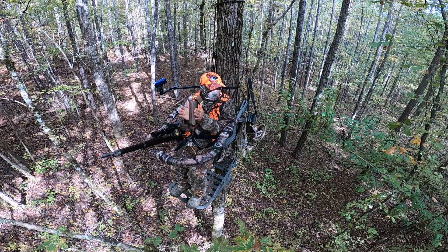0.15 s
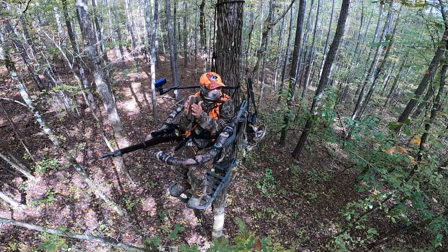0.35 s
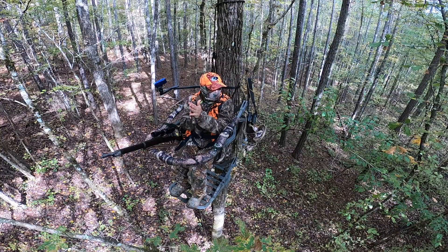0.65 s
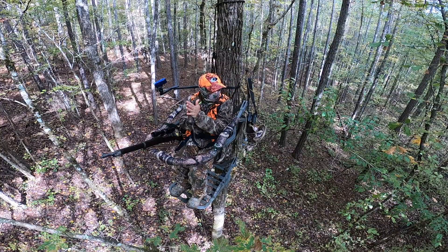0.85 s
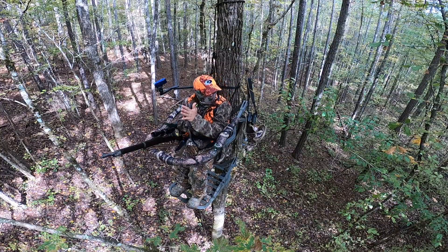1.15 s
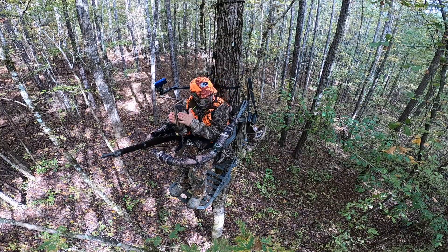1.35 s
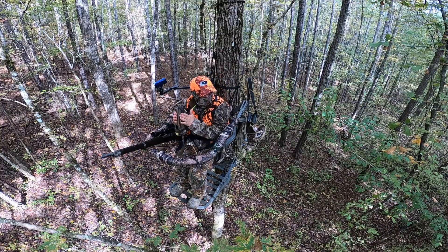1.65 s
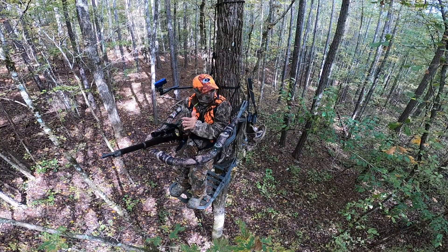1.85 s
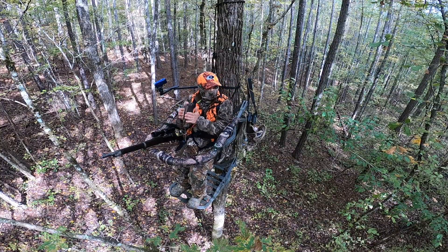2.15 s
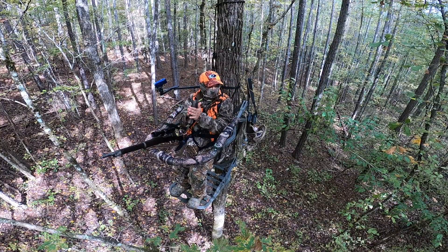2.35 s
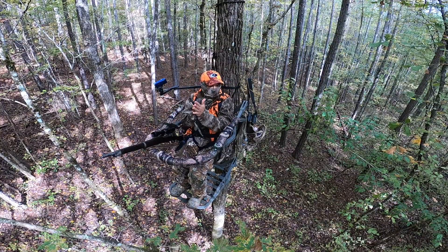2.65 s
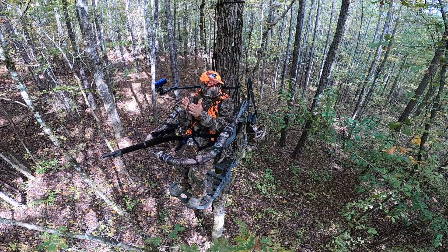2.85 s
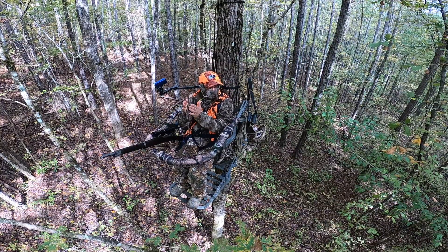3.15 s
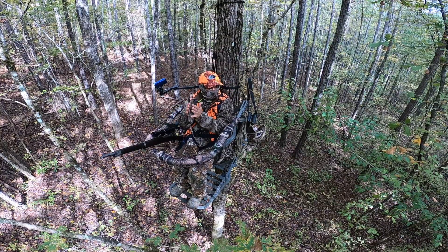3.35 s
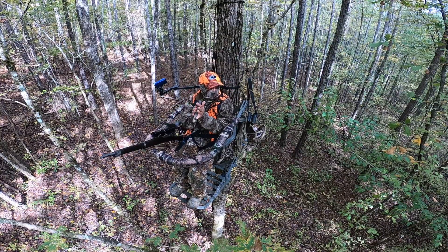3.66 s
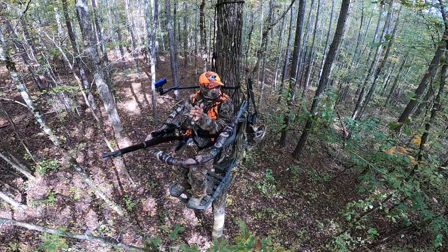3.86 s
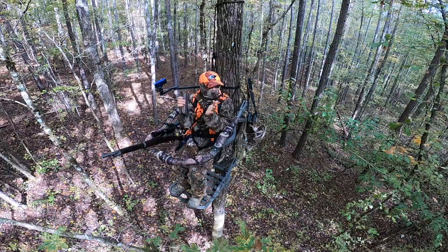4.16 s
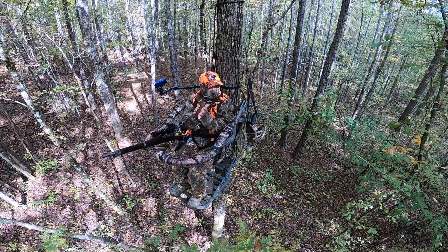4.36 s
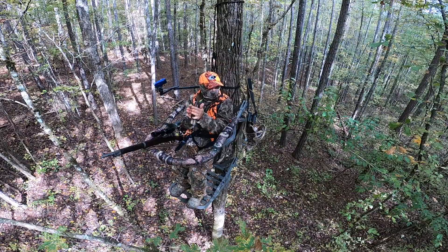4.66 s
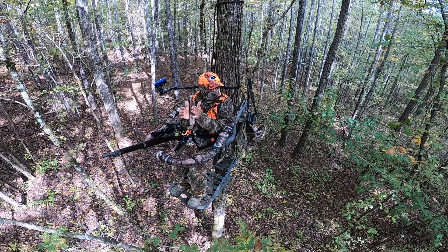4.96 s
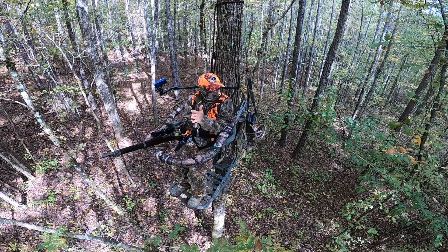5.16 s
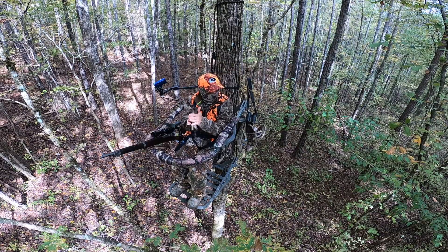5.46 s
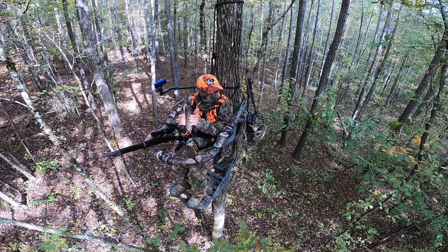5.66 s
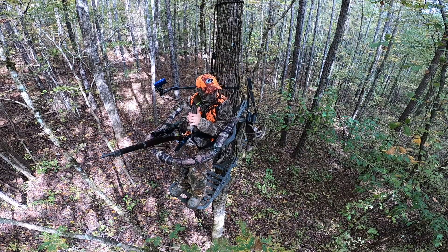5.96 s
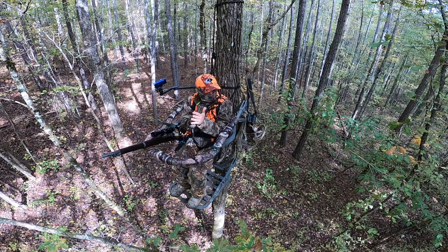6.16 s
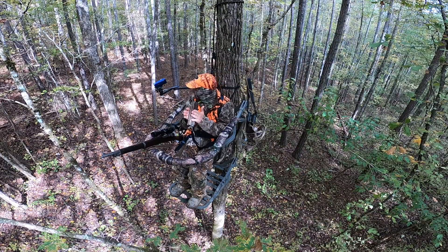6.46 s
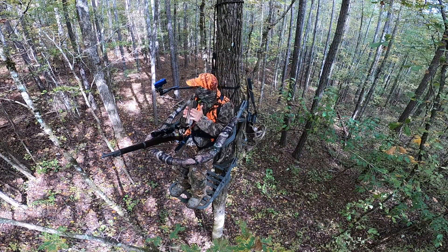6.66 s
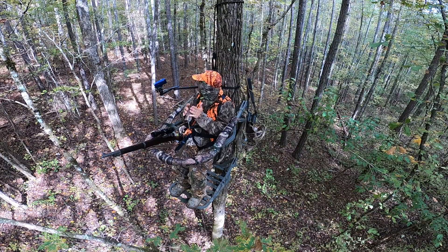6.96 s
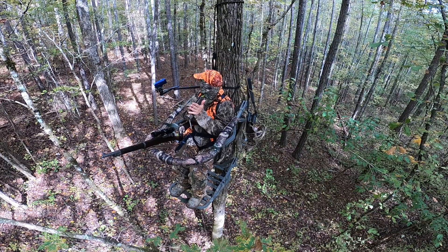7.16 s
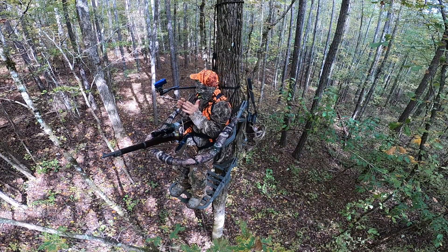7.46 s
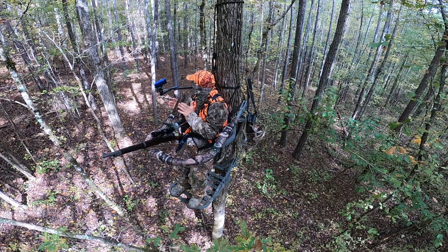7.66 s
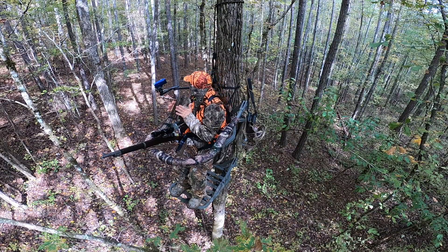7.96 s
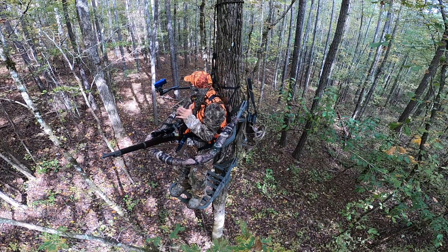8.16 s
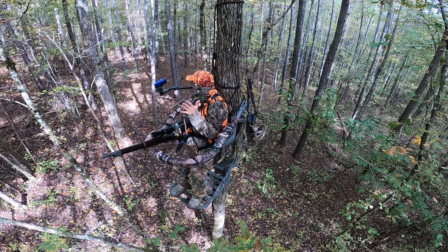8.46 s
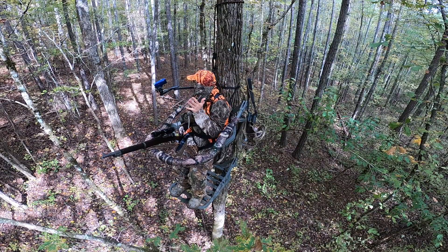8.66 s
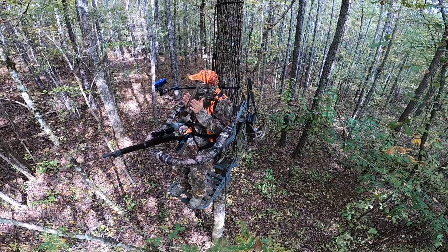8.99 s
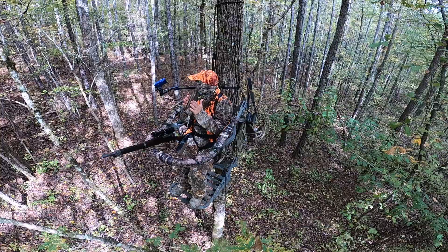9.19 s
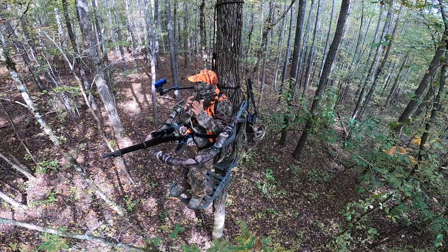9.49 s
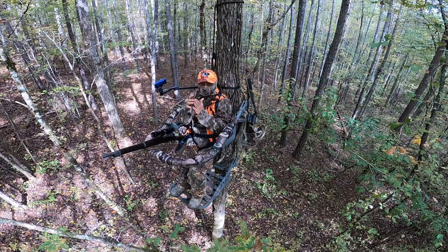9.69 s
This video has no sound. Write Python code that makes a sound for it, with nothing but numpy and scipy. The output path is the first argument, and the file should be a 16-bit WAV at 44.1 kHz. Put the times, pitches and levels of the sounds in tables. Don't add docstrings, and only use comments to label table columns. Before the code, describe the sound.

A hunter high in a tree works a bag of hard antler rods by hand. Sharp, dry knocks come in tight irregular clusters with quiet gaps, then a denser rolling rattle with short scrapes, then slower separate bursts. A soft, bright echo scatters off the trunks over hushed leaves. The close microphone catches low wind rumble and slightly overloads on the hardest hits.

```python
import sys
import numpy as np
from scipy import signal
from scipy.io import wavfile
from scipy.ndimage import uniform_filter1d

SR = 44100
rng = np.random.default_rng(int(sys.argv[2]) if len(sys.argv) > 2 else 0)


def undo_db(level):
    steps = np.asarray(level, float) / 20
    return 10 ** steps


def store_pcm(level_fs):
    pcm = np.round(np.clip(level_fs, -1, 1) * 32767).astype(np.int16)
    wavfile.write(sys.argv[1], SR, np.atleast_2d(pcm).T)


N = 433503

# [f/Hz, echo level/dB, t60/s, left-right likeness 0-1]
WOODS_BANDS = [(60, -34.5, 1.6, 0.96), (500, -58, 29, .8), (1500, -38.5, 0.89, 0.26),
               (2820, -34, 0.98, 0.07), (4500, -37, 0.89, 0.084), (6500, -30, 0.73, 0.0065),
               (8900, -35.5, 0.53, 0.0099), (12500, -30, 0.72, 0.087)]


def curve(points, hz, column=1):
    table = np.array(points)
    return np.interp(np.log(hz), np.log(table[:, 0]), table[:, column])


def drift(rate):
    r = np.exp(-80 * np.pi * rate / SR)
    coarse = rng.standard_normal(N // 40 + 2002)
    slow = signal.lfilter([1], [1, -2 * r, r * r], coarse)[2000:]
    return np.interp(np.arange(N) / 40, np.arange(len(slow)), slow / slow.std())


def noise_bands(size):
    white = rng.standard_normal((2, 2, size))
    edges_hz = 22 * 2 ** np.arange(0, 9.6, .5)
    for k, (low, high) in enumerate(zip(edges_hz, edges_hz[1:])):
        band = signal.butter(2, [low, high], "band", fs=SR, output="sos")
        mid, side = signal.sosfilt(band, white[k % 2])
        yield np.sqrt(low * high), mid, side


def spread(mid, side, alike):
    alike = np.clip(alike, -1, 1)
    return np.sqrt(1 + alike) * mid + np.sqrt(1 - alike) * side * [[1], [-1]]


def wind(lumpy_db=1.5, under_db=-0.5, top_hz=53.0):
    # [t/s, level/dB]
    gusts = [(0.0, -62), (.25, -45.5), (.42, -54.5), (0.7, -49), (1.1, -73.5), (1.72, -47.5), (2.1, -60.5),
             (2.65, -68.5), (3.5, -55.5), (4.7, -67.5), (5.47, -59.5), (6.9, -63), (7.2, -50.5),
             (7.5, -66.5), (8.03, -57.5), (9.25, -64), (9.5, -60), (9.83, -50.5)]
    rumble = signal.butter(3, [24.0, top_hz], "band", fs=SR, output="sos")
    mid, side = signal.sosfilt(rumble, rng.standard_normal((2, N)))
    gust_db = np.interp(np.arange(N) / SR, *np.transpose(gusts)) + lumpy_db * drift(3.0)
    return undo_db(gust_db + under_db) * spread(mid, side, .6) / mid.std() * undo_db([[-3.5], [2.5]])


def hush(flicker_db=1.0, over_db=4.0):
    # [f/Hz, level per Hz/dB]
    hush_bands = [(20, -7), (45, -8), (85, -18.5), (178, -4.5), (290, -12.5), (1110, -14.5), (1970, -19.5),
                  (2800, -20.5), (4700, -26), (6500, -38.5), (9000, -43), (11500, -64), (16000, -92.5)]
    # [t/s, hush level/dB]
    breeze = [(0, -50.5), (0.601, -55.5), (1.1, -52), (3.098, -56), (3.5, -53), (6.6, -53), (7.899, -49),
              (8.399, -53), (9.83, -50)]
    out = 0
    for hz, mid, side in noise_bands(size=N):
        lumps_db = flicker_db * drift(7.0) + 190 / hz * np.tanh(drift(3.1))
        gain = undo_db(curve(hush_bands, hz) + lumps_db)
        out = out + gain * spread(mid, side, curve(WOODS_BANDS, hz, column=3))
    breeze_db = np.interp(np.arange(N) / SR, *np.transpose(breeze))
    return undo_db(breeze_db + over_db) * out / out.std() * undo_db([[-.5], [.5]])


def jolts(width_s=0.0012, settle_hz=22.0):
    # [t/s, signed push 0-1]
    pushes = [(.16, -.05), (2.148, .05), (2.473, -.08), (2.828, -.05), (2.872, .06), (4.378, .1),
              (4.38, -.1), (6.461, -.14), (8.252, -.12), (8.994, -.07), (9.022, .29)]
    t, out = np.arange(N) / SR, np.zeros((2, N))
    for at_s, push in pushes:
        near = slice(int((at_s - .01) * SR), int((at_s + .01) * SR))
        bump = push * np.exp(-((t[near] - at_s) / width_s) ** 2)
        out[:, near] += np.outer([.03, 1.6], bump)
    return signal.lfilter(*signal.butter(1, settle_hz, "high", fs=SR), out)


def woods(source, rise_s=0.002):
    t, echo = np.arange(SR) / SR, 0
    for hz, mid, side in noise_bands(size=SR):
        fall = undo_db(curve(WOODS_BANDS, hz) - 60 * t / curve(WOODS_BANDS, hz, column=2))
        echo = echo + fall * spread(mid, side, curve(WOODS_BANDS, hz, column=3))
    echo = echo * (1 - np.exp(-t / rise_s)) * undo_db(-20.0)
    return signal.fftconvolve(source, echo, axes=1)[:, :N]


def scrapes(grains_per_s=3500):
    # [start t/s, length/s, level/dB, low ridge level/dB]
    strokes = [(0.293, 0.027, -38, 6), (1.32, .025, -38, -0.5), (2.804, 0.02, -32.5, 2),
               (3.609, 0.052, -43, 2), (3.945, .04, -32, 6.5), (3.983, 0.042, -36.5, 6.5),
               (4.969, 0.086, -44, 7), (5.122, 0.05, -22.5, -2), (5.407, 0.063, -27.5, 0),
               (5.489, 0.062, -30, 1), (5.7, 0.14, -46.5, 4.5), (7.081, 0.046, -22.5, -3.5),
               (8.933, 0.06, -40.5, 0)]
    # [f/Hz, bandwidth/Hz, level/dB]
    ridges = [(1510, 380, 6.5), (2300, 380, -1.5), (3300, 1100, 1), (4400, 420, -14), (6340, 950, -18)]
    t, out = np.arange(N) / SR, 0
    grains = (rng.random(N) < grains_per_s / SR) * undo_db(2.5 * rng.exponential(1, N))
    grains = grains * rng.choice([-1, 1], N)
    stroke, low_stroke = np.zeros(N), np.zeros(N)
    for start_s, length_s, level_db, ridge_db in strokes:
        swell = undo_db(level_db) * np.sin(np.pi * np.clip((t - start_s) / length_s, 0, 1))
        stroke = stroke + swell
        low_stroke = low_stroke + swell * undo_db(ridge_db)
    for k, (hz, width_hz, db) in enumerate(ridges):
        r = np.exp(-np.pi * width_hz / SR)
        poles = [1, -2 * r * np.cos(2 * np.pi * hz / SR), r * r]
        zeros = [(1 - r * r) / 2, 0, (r * r - 1) / 2]
        rubbed = grains * (stroke if k else low_stroke) + 1e-18
        out = out + undo_db(db + 16.0) * signal.lfilter(zeros, poles, rubbed)
    soft = signal.butter(3, [950.0, 6000.0], "band", fs=SR, output="sos")
    return signal.sosfilt(soft, out) * undo_db([[-.7], [.7]])


def contacts(touch_bright_db=-11.5, twig_bright_db=4.5):
    # [t/s, peak
    # level/dB, strongest ring f/Hz, brightness/dB]
    rod_knocks = [(0.1246, -16, 5600, -1.5), (0.1293, -17, 3200, -6), (0.1451, -1.5, 4140, 2),
                  (0.1535, 0.5, 3600, -7), (0.1591, 3, 3730, -0.5), (0.1678, -3.5, 4520, 5.5),
                  (0.1728, 5.5, 4020, 2), (0.1838, -4.5, 3940, 3.5), (0.188, 2, 3050, 2),
                  (0.1998, -9, 4390, 4), (0.2041, -13.5, 2940, -3.5), (0.2178, -9, 3370, -3),
                  (0.2234, -5, 3380, 4.5), (0.2336, -21, 4170, -3.5), (0.3229, -20.5, 3470, -7.5),
                  (0.3297, -13.5, 2930, -4), (0.3437, -15.5, 3300, -1), (0.3509, -19, 1910, -15),
                  (0.5551, -8, 3270, -5), (0.5614, -4.5, 3300, -3.5), (0.5698, -2.5, 6200, -3.5),
                  (0.5761, -2, 3970, 6), (0.5823, 0.5, 4270, 5), (0.5863, -12.5, 3230, 1),
                  (0.5928, -2, 2600, -1), (0.598, 2, 4210, 6), (0.61, -7, 3100, -3),
                  (0.6153, 0, 3170, -5.5), (0.6239, -2.5, 4540, 3.5), (0.6278, -5.5, 3060, 2.5),
                  (0.6338, -9, 3220, -3.5), (0.6431, -22.5, 2970, -2.5), (1.344, -8, 3140, -2.5),
                  (1.347, 2.5, 3590, 0), (1.3553, 0, 3260, 2.5), (1.3606, -3, 3300, -3.5),
                  (1.3637, 0.5, 3100, 0), (1.371, -5, 3900, 3.5), (1.3737, 0.5, 4360, 6),
                  (1.3796, 1, 3540, -2.5), (1.3839, 2.5, 3660, 2.5), (1.3933, -10, 3900, -2),
                  (1.407, -7, 3080, -10), (1.7936, -8, 3530, -9.5), (1.8041, 1.5, 4050, 5),
                  (1.8118, 1, 3720, -3), (1.8239, -11.5, 4610, -4.5), (1.8269, -4, 3350, -9),
                  (1.8343, 3.5, 3310, -4.5),
                  (1.8392, 0, 3130, 3.5), (1.844, -8.5, 3044, -1), (1.8528, -9, 3184, -0.5),
                  (1.8579, -9, 4145, 1.5), (1.862, -1.5, 4350, 0.5), (1.871, -13, 3740, -4),
                  (1.878, -16, 2670, -6), (2.1076, -18.5, 3120, -12.5), (2.1276, -8.5, 4580, -9.5),
                  (2.13, -2.5, 3450, 3), (2.138, -6, 3210, -1), (2.1442, -2, 4786, 2.5),
                  (2.1485, 4, 4670, -4), (2.1611, -2, 3260, 0), (2.1682, 1.5, 4490, -6.5),
                  (2.1718, 2.5, 3356, 4), (2.183, -4.5, 3375, 0.5), (2.1873, -11.5, 3154, 1),
                  (2.432, -10, 4220, -3.5), (2.436, -4, 4280, -4), (2.4475, 3, 3220, 0),
                  (2.4563, 5, 3780, 2), (2.46, -4.5, 3217, 0.5), (2.469, 2, 3870, 9),
                  (2.4808, -4.5, 3080, -0.5), (2.491, -13, 3800, -10), (2.5144, -9, 2730, -1.5),
                  (2.8232, 0.5, 3870, 2), (2.8292, 0, 3365, 1), (2.836, -2, 4710, 4),
                  (2.8413, -2.5, 3230, 2), (2.8484, -4.5, 2623, 6), (2.8531, 2.5, 3210, 0.5),
                  (2.8602, 2, 4716, 2), (2.8638, 3, 2964, 1), (2.8734, -11, 3130, 0.5),
                  (2.879, -12.5, 3240, 1), (2.8936, -14.5, 3660, 0), (2.897, -16.5, 4830, 7),
                  (3.638, -13, 1440, -10), (3.645, -10, 2244, -0.5), (3.6487, -2.5, 3537, 2),
                  (3.6529, 7.5, 4270, 2), (3.6619, 3.5, 4570, 3.5), (3.6668, -2, 4060, 12.5),
                  (3.6739, -0.5, 3400, 0), (3.6781, -4, 4390, 1), (3.6884, -12.5, 5150, 0.5),
                  (3.933, -15.5, 1380, -8.5), (4.007, -15.5, 4120, -1.5),
                  (4.0276, 0.5, 4310, -5), (4.0412, -9.5, 3360, -17.5), (4.0527, 0, 3190, 1.5),
             (4.129, -4, 3000, -7.5), (4.288, -13, 2910, -4.5), (4.298, -7, 4453, 6),
             (4.3057, -6.5, 3660, -2.5), (4.312, -7.5, 3060, -13.5), (4.3278, -14, 2884, -6.5),
             (4.3404, -6.5, 4820, -2.5), (4.3595, -5, 6120, -1), (4.3668, -13.5, 4010, 0),
             (4.3777, 4, 2476, 5), (4.381, 4, 3337, 3), (4.3898, -2.5, 4580, 5), (4.3968, -6, 4710, 4.5),
             (4.7076, -17, 3980, -9), (4.7163, -12, 3925, 1.5), (4.726, -7, 2424, -3),
             (4.7314, 0.5, 4440, -5), (4.7458, -3.5, 4167, -7.5), (4.752, -6.5, 4130, -3.5),
             (4.7592, -2.5, 4230, -6), (4.764, -6.5, 1940, -15.5), (4.7705, -7, 4090, -5.5),
             (4.7761, 5.5, 4820, -2), (4.7842, -3, 4350, -6), (4.7874, 2.5, 3100, 0),
             (4.7964, -5.5, 3190, 9), (4.8025, -16.5, 4380, -2.5), (4.857, -12.5, 3840, 5),
             (4.89, -6, 3230, -1.5), (4.898, -3.5, 3320, -4.5), (4.907, -14, 3580, -10),
             (5.0372, -21, 3400, -2), (5.0852, -11.5, 2386, -10), (5.097, -2, 6480, 11.5),
             (5.1037, 2.5, 4420, 6), (5.108, -3, 3500, 4), (5.1163, -1.5, 1440, 2),
             (5.1209, -6.5, 3430, -4), (5.14, -11, 3230, -6), (5.146, -20.5, 3500, -8.5),
             (5.1511, -19, 3460, -6.5), (5.1581, -17, 3403, -8), (5.1647, -11.0, 4150, 0),
             (5.1771, -10.5, 4160, 3.5), (5.181, -14, 4480, 5.5), (5.216, -12.5, 2790, -7.5),
                  (5.2248, -14.5, 3940, -6.5), (5.2326, -1.5, 3940, -7), (5.3776, -7.5, 3265, -1),
                  (5.3814, -9.5, 3450, -16.5), (5.3893, 0.5, 4050, 3.5), (5.3944, -5, 3796, -3),
                  (5.3995, 2, 3100, -4), (5.4059, -2.5, 3490, 0.5), (5.4132, -9, 3400, -8),
                  (5.422, -12, 2020, -7), (5.4334, -11, 2980, -13.5), (5.448, -5, 1680, -7.5),
                  (5.4908, -20, 2500, -6), (5.5181, -19, 1616, -9.5), (5.522, -10.5, 2900, -12),
                  (5.536, -1, 3380, -6), (5.5422, -6.5, 3270, -11.5), (5.549, -2, 4880, -3.5),
                  (5.5576, 0.5, 1674, -7.5), (5.5619, 1.5, 2800, -2), (5.5723, -7, 3730, -3.5),
                  (5.5782, -15, 1726, 2), (5.5923, -6.5, 3150, -6.5), (5.6235, -18.5, 3900, -11.5),
                  (5.6494, -0.5, 3560, 1.5), (5.6557, 2.5, 3945, -7), (5.66, -8.5, 3370, -2),
                  (5.6646, -8, 2706, -10), (5.674, -8, 4480, 2), (5.6778, -2, 3357, -0.5),
                  (5.6837, 1, 2028, 2), (5.6883, -7, 4046, -1), (5.6991, -4, 3280, 4),
                  (5.7663, -17.5, 3340, -11.5), (6.0279, 0, 4550, 7), (6.0404, -1, 4530, 3),
                  (6.047, 2, 5335, 0), (6.0547, -9, 3640, 4.5), (6.0602, -8.5, 3420, 2),
                  (6.0677, -4, 3020, -3.5), (6.0778, -13, 2930, 0.5), (6.0855, -4, 2976, 1),
                  (6.1003, -15.5, 2235, -3.5), (6.1053, -8, 2280, -5.5), (6.1129, -2, 4500, -4),
                  (6.12, -1, 4520, 3.5), (6.127, -8.5, 4490, 1.5), (6.2047, -15, 2060, 0),
                  (6.3765, -5, 4330, 1.5), (6.382, -14.5, 2474, -4),
                  (6.39, -1, 2580, -8.5), (6.4007, 4, 4070, 5), (6.4056, -8, 4510, 2),
                  (6.414, 1, 3263, 0.5), (6.4211, -3, 3550, -1.5), (6.4322, -1.5, 2664, 1),
                  (6.443, -6, 3700, -4), (6.4506, -4.5, 3270, 1.5), (6.456, 2.5, 2778, 4),
                  (6.462, -1, 4300, 1), (6.4768, -10, 3560, 4), (7.0962, -11, 3480, -5),
                  (7.101, -4.5, 4315, 5), (7.1056, 1, 2795, -5), (7.11, -4, 4570, -2),
                  (7.1322, -3.5, 4565, 3), (7.1495, -6.5, 3490, -7), (7.4937, -13.5, 2797, -5),
                  (7.4998, -1, 4260, 9), (7.5073, -2, 4850, 1.5), (7.518, -1.5, 2930, 1),
                  (7.5298, -6, 6270, 2), (7.5382, 1.5, 3930, 4.5), (7.5443, -3.5, 2930, -5.5),
                  (7.5486, 0.5, 3000, 2.5), (7.5569, -4, 2995, -10), (7.5634, -11.5, 3450, -8.5),
                  (7.5675, -5, 2790, -4.5), (7.5747, -17, 3640, -5.5), (7.583, -1.5, 4130, -1.5),
                  (7.5894, -0.5, 4340, 3), (7.601, -15, 2770, -9), (8.1994, -6.5, 3960, -3.5),
                  (8.205, 2.5, 3107, 5.5), (8.2123, -2, 3450, 0), (8.2236, -11, 3090, -1),
                  (8.2372, -7.5, 4154, -1), (8.243, 4, 4566, 5.5), (8.245, 2.5, 3146, 7.5),
                  (8.254, 0.5, 4270, 2), (8.2708, -5, 3820, 9), (8.9477, -17.5, 2570, -9.5),
                  (8.9678, -22.5, 3790, -10), (8.9735, -20, 3674, -11.5), (8.9849, -2.5, 2964, 0.5),
                  (8.994, 3.5, 4250, 1.5), (9.0072, -12, 3606, 5.5), (9.0115, -2.5, 4480, 1.5),
                  (9.0161, 3.5, 3253, 5.5), (9.026, -7, 1700, -3.5),
                  (.605, -4.5, 3550, 1.5), (1.8006, -5.5, 3383, -5), (2.488, -14, 3500, -4),
               (2.8202, -11, 3500, -2.5), (4.3711, -5.5, 4197, 2), (7.0904, -10, 2360, -7.5),
               (7.1286, -6, 4340, -2.5), (8.1939, -18, 3000, -6), (8.26, -2, 4380, 0),
               (8.265, -2, 5000, -0.5), (8.9832, -8, 3385, -6.5)]
    # [t/s, peak level/dB, strongest ring f/Hz]
    touches = [(0.545, -25.5, 1960), (1.7816, -33, 3216), (2.1938, -20.5, 2330), (2.4089, -23, 4010),
               (2.5041, -17.5, 3400), (3.3608, -37.5, 1640), (3.7477, -22, 3540), (4.019, -23, 3060),
               (5.273, -20, 2970), (5.372, -25, 1250), (6.018, -15.5, 3190), (6.3604, -28, 1810),
               (7.068, -27, 1686), (8.3269, -17.5, 3790), (2.0924, -22, 3410), (2.245, -22.5, 2000),
               (5.081, -22, 2900), (4.522, -28, 2300), (4.9761, -20.5, 2186), (3.965, -21, 3200),
               (4.996, -26.5, 4030), (5.0337, -21.5, 2400)]
    # [t/s, peak level/dB, strongest ring f/Hz]
    twigs = [
        (7.436, -37.5, 6500),
        (7.938, -36.5, 7520),
    ]
    faint = [(*row, touch_bright_db) for row in touches] + [(*row, twig_bright_db) for row in twigs]
    return np.vstack([rod_knocks, faint]).T


def sliding_contacts(rub_db=-12.5):
    at_s, peak_db, ring_hz, bright_db = contacts()
    slide = rng.random((len(at_s), 4))
    order = np.append(np.sort(at_s), N / SR)
    wait_s = order[np.searchsorted(order, at_s, "right")] - at_s
    rubbed_db = peak_db + rub_db - 28 * (wait_s > .015)
    wait_s = np.minimum(wait_s, .013)
    early_s = at_s + wait_s * slide[:, 0] / 2
    late_s = at_s + wait_s * (1 + slide[:, 1]) / 2
    at_s = np.concatenate([at_s, early_s, late_s])
    peak_db = np.concatenate([peak_db, rubbed_db + 6 * slide[:, 2], rubbed_db + 6 * slide[:, 3]])
    return at_s, peak_db, np.tile(ring_hz, 3), np.tile(bright_db, 3)


def gripped_rings(modes_hz, t, t60, grip_s=.0052):
    rings = undo_db(-60 * t / t60) * np.exp(2j * np.pi * modes_hz[:, None] * t)
    build_s = .0001 + 1.0 / modes_hz[:, None]
    rings = rings * np.sin(np.pi / 2 * np.minimum(t / build_s, 1)) ** 2
    rings = rings * np.exp(-(t / grip_s) ** 2)
    return rings * (1 + 0.68 * np.exp(-t / 0.0004))


def knocks(t60_s=0.25, uneven_db=5.0, favour_db=9.0, bright_share=1.01, soft_db=0.66, boost_db=-4.0):
    # [f/Hz, level per Hz/dB]
    rod_modes = [(450, -18.5), (780, -19.5), (1440, -2.5), (3200, 3), (4500, 2), (5800, -4), (6400, -3),
                 (7100, -10.5), (8600, -9.5), (9900, -22), (10800, -19), (11900, -41), (13200, -31),
                 (16000, -46)]
    # [t/s, low ring level/dB]
    looseness = [(.2, 4), (.6, 2.5), (1.37, 5.5), (1.83, 4), (2.8, 1.5), (4.0, 1), (4.8, 5.5), (5.2, 2),
                 (5.6, 6.5), (6.1, 0), (7.5, 2), (8.2, -1.5), (9.0, 4)]
    # [f/Hz, width/octaves, level/dB]
    far_rings = [
        (1510, 0.25, 0.5),
        (4540, 0.16, 2.0),
    ]
    at_s, peak_db, ring_hz, bright_db = sliding_contacts()
    modes_hz = np.linspace(21, 127, 210) ** 2 * undo_db(rng.normal(0, .03, 210))
    t = np.arange(900) / SR
    t60 = (t60_s * np.minimum(5000 / modes_hz, 1) ** 0.99)[:, None]
    rings = gripped_rings(modes_hz, t, t60)

    uneven, phase, broad, face_a, face_b = rng.standard_normal((5, len(at_s), len(modes_hz)))
    octaves = np.log2(modes_hz / ring_hz[:, None])
    broad_db = 7.0 * uniform_filter1d(broad, size=14, axis=1)
    own_db = uneven_db * uneven + favour_db * np.exp(-(octaves / .07) ** 2) - 1.5 * np.abs(octaves)
    hard_db = bright_share * bright_db[:, None] * np.clip(np.log2(modes_hz / 3400.0), 0, 1.3)
    starved_db = soft_db * np.minimum(peak_db, 0)[:, None] * np.clip(np.log2(modes_hz / 6000.0), 0, 1)
    loose_db = np.interp(at_s, *np.transpose(looseness))[:, None]
    loose_db = loose_db * np.exp(-(np.log2(modes_hz / 1450.0) / .28) ** 2)
    colour_db = own_db + broad_db + hard_db + starved_db + loose_db
    height = undo_db(curve(rod_modes, modes_hz) + colour_db) * np.sqrt(modes_hz ** .5 / t60[:, 0])
    struck = height * np.exp(1j * 0.94 * phase)

    apart = .15 * np.clip(modes_hz / 4500, .4, 1) * (face_a + 1j * face_b)
    shade = np.exp(-1j * np.pi * modes_hz * 1.8e-5) * undo_db(-.2 - modes_hz / 5000)
    left = (struck * (1 + apart) * shade) @ rings
    right = (struck * (1 - apart) / shade) @ rings
    front = np.abs(left + right)[:, :150].mean(axis=1)
    gain = undo_db(peak_db + boost_db) / front * 2

    far_db = 0
    for hz, width_oct, db in far_rings:
        off_oct = np.log2(modes_hz / hz) + 0.048 * phase[:, :1]
        far_db = far_db + db * np.exp(-(off_oct / width_oct) ** 2)
    far_db = (1 + 1.8 * uneven[:, :1]) * far_db
    even = height * undo_db(far_db - 0.52 * own_db - .5 * broad_db)
    faces = [(even * np.exp(3j * face)) @ rings for face in (face_a, face_b)]

    out = np.zeros((4, N + len(t)))
    where = (at_s * SR).astype(int)[:, None] + np.arange(len(t))
    for channel, wave in zip(out, (left, right, *faces)):
        np.add.at(channel, where, gain[:, None] * wave.imag)
    no_lows = signal.butter(3, 920, "high", fs=SR, output="sos")
    out = signal.sosfilt(no_lows, out + 1e-18)
    return out[:2, :N], out[2:, :N]


def scene():
    rods, toward_trees = knocks()
    grind = scrapes()
    return rods + grind + woods(toward_trees + grind) + hush() + wind() + jolts()


def low_pass(x):
    return signal.sosfilt(signal.butter(12, 15900, fs=SR, output="sos"), x)


def record(dry):
    mix = np.clip(dry, -.97, .97)
    return low_pass(mix)


dry = scene()
out = record(dry)
store_pcm(out)
```